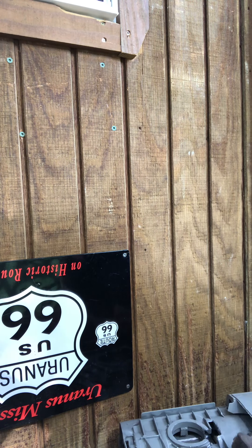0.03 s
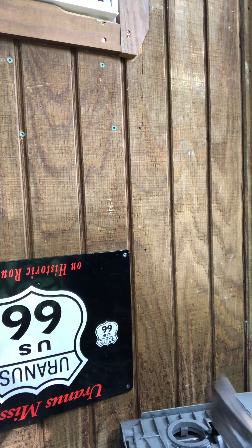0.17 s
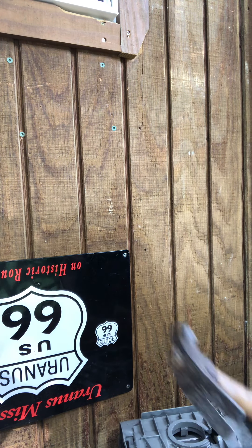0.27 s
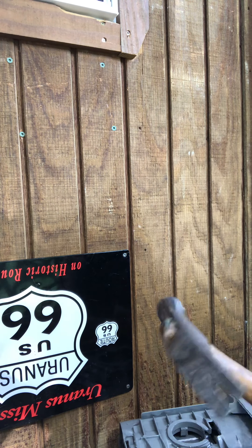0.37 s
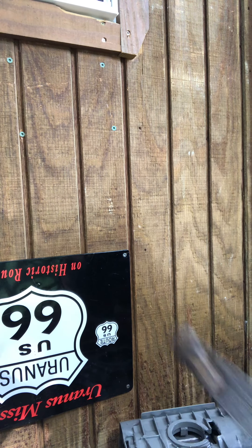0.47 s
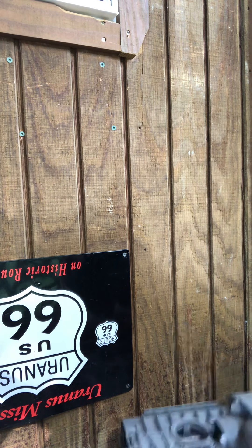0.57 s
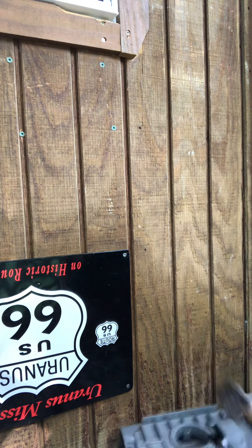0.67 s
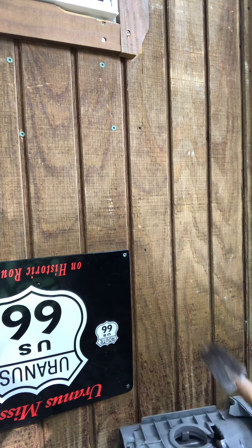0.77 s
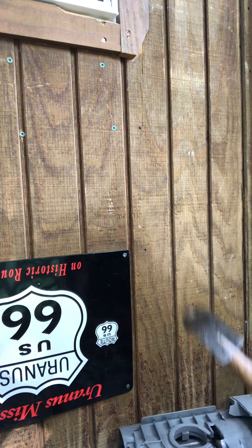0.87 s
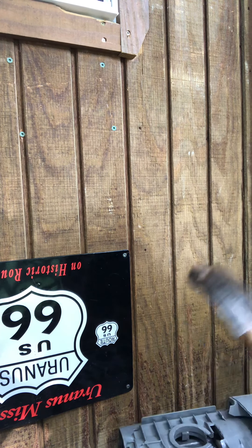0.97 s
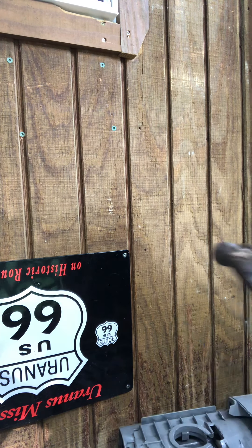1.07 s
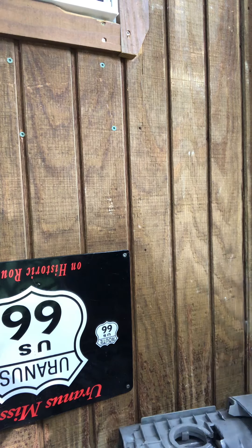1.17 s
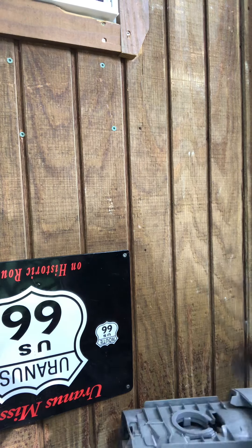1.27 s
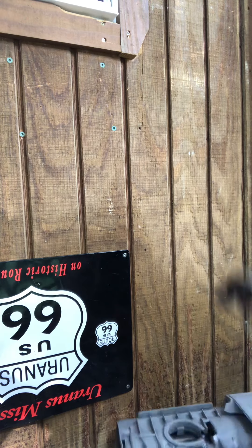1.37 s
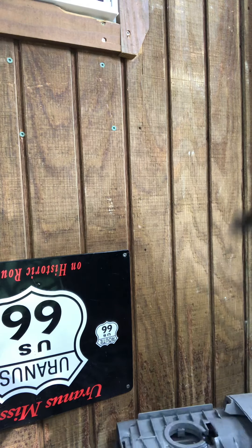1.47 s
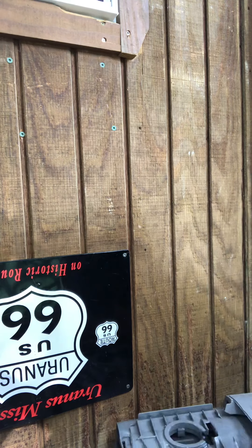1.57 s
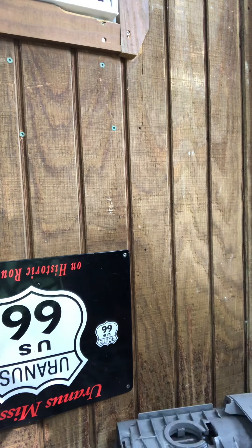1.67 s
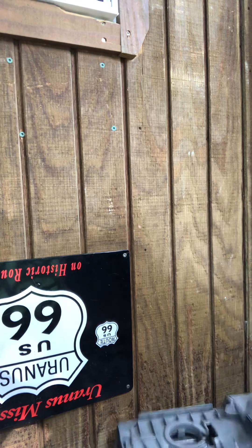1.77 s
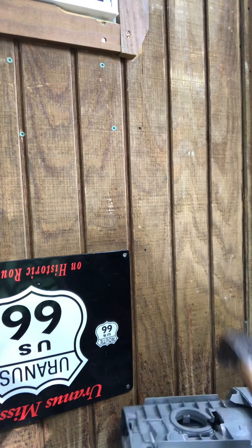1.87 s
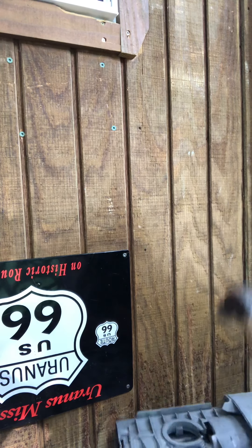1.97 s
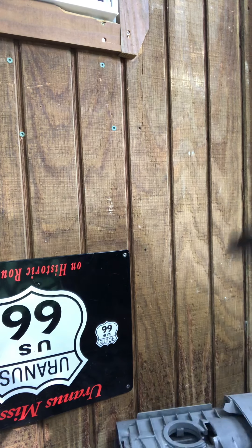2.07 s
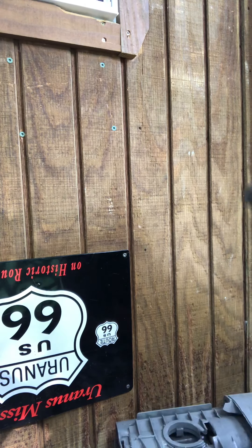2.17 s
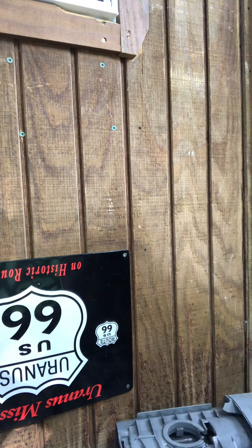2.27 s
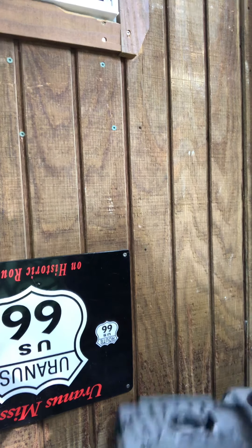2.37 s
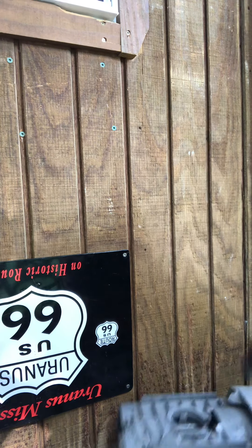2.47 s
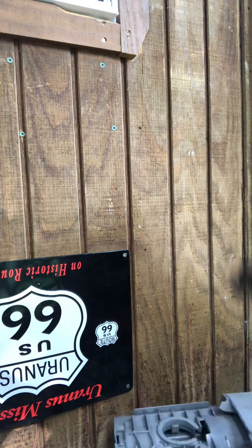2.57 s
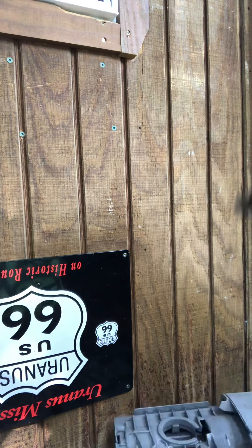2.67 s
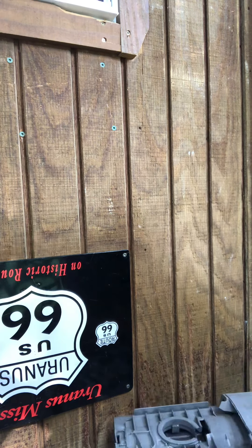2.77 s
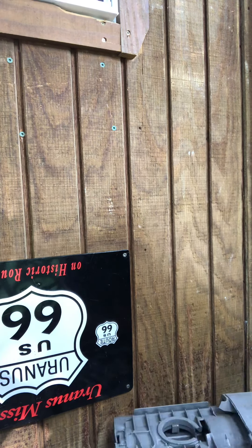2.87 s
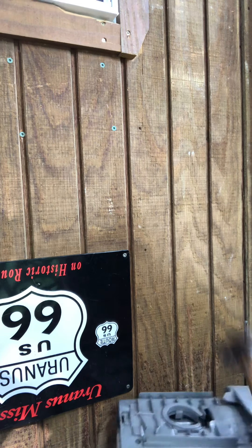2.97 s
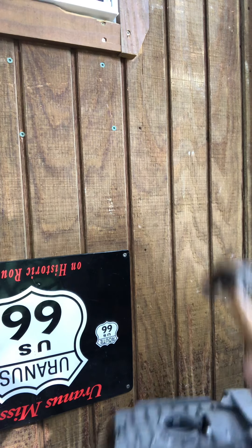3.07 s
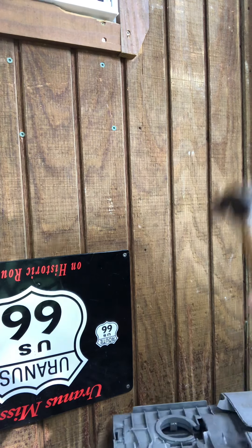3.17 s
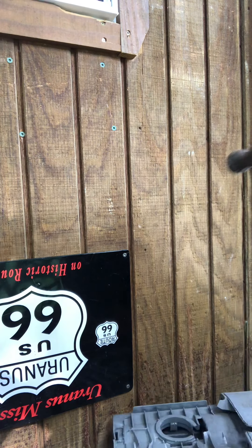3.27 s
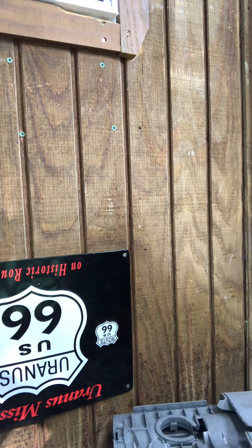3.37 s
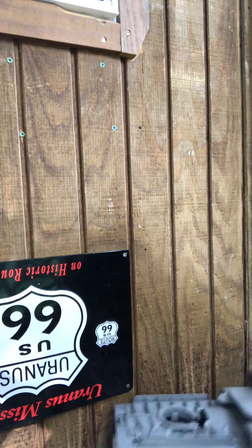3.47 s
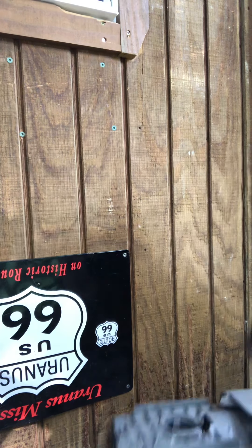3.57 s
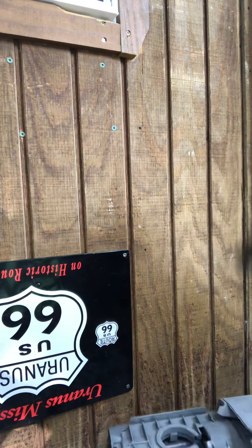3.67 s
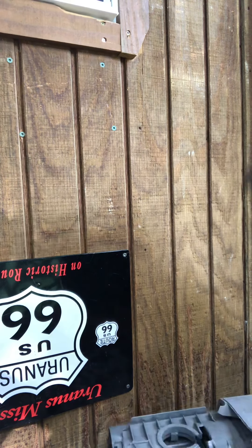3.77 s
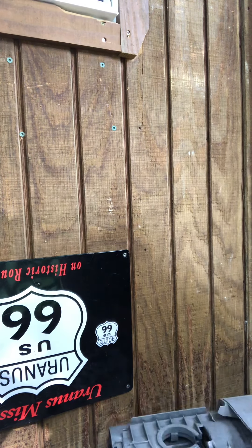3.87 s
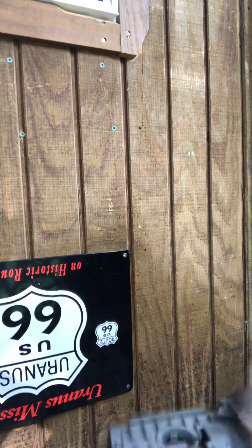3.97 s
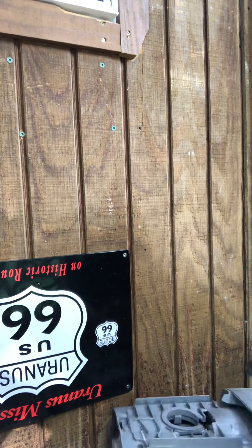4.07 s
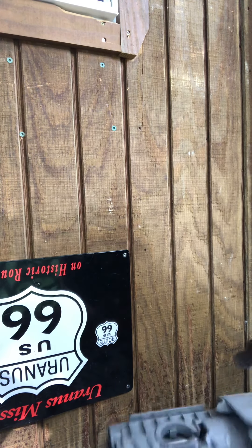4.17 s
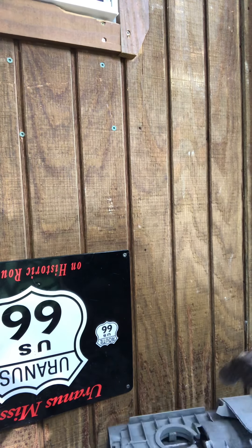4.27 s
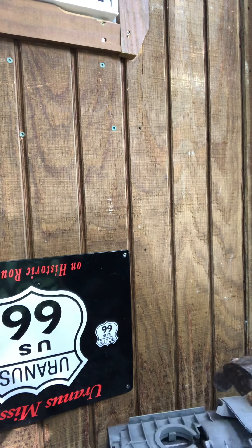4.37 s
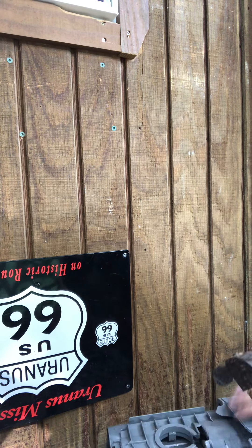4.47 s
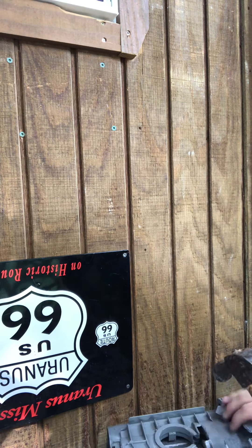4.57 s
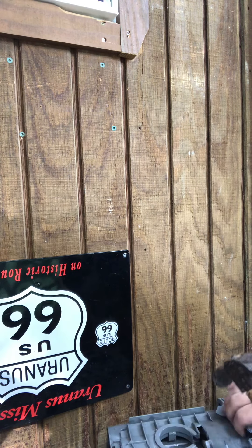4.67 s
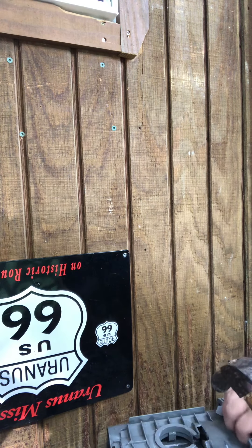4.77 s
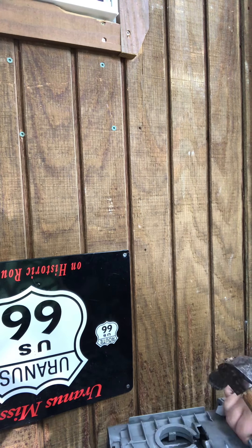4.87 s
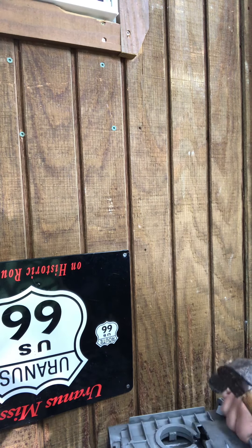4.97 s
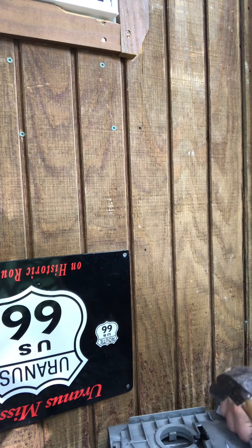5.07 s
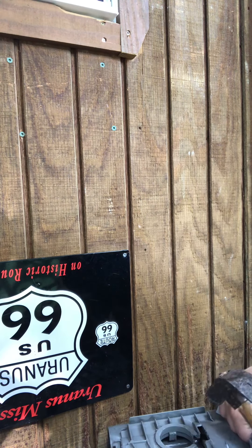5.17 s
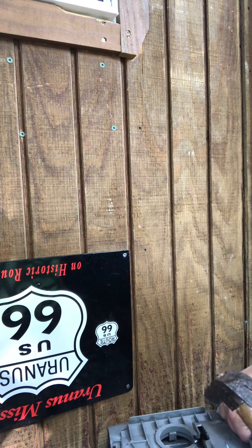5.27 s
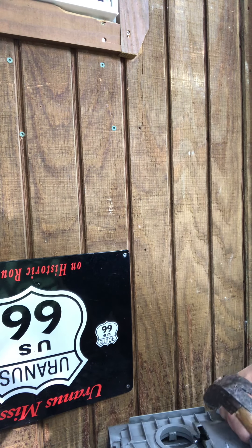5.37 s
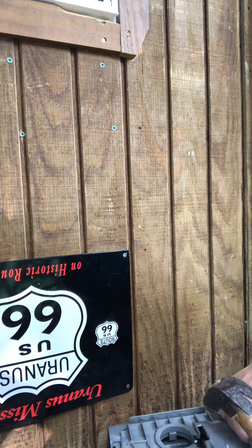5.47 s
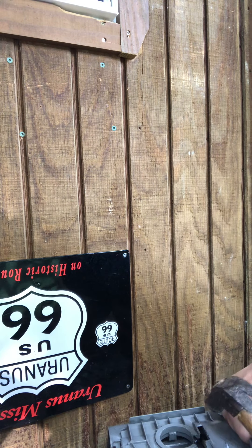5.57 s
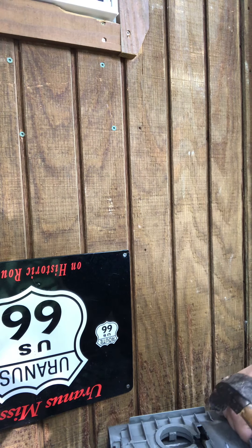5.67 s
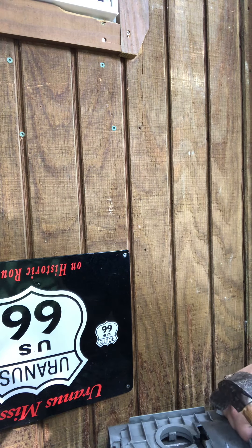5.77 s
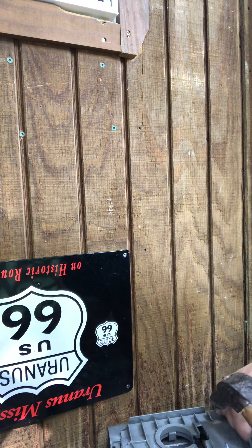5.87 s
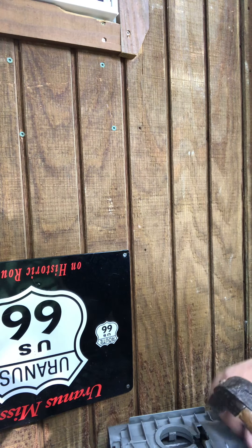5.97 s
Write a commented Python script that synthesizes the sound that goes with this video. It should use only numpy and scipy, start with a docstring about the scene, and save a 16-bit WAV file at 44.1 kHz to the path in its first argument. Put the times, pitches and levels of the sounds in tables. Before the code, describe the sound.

A hammer cracks a hard plastic housing seven times on an outdoor bench, each blow clattering and bouncing, then quiet handling.

```python
"""Outdoors, one microphone at a bench against a plank wall; a far rush like traffic and a low hum lie underneath.
From 0.57 s a hammer strikes a hard plastic housing seven times: noise cracks, shell chatter, a bench boom.
The housing jumps and lands within a fifth of a second of each blow, as clacks and ringing knocks; loose parts tick.
At 4.37 s the steel head clinks once, as a bright set of decaying tones.
Then the hand rubs and bumps the parts, in grainy noise, and a thin whine comes up behind."""
import sys
import numpy as np
from scipy import signal
from scipy.fft import rfft, irfft, next_fast_len
from scipy.io import wavfile
from scipy.ndimage import map_coordinates

SR = 44100
rng = np.random.default_rng(int(sys.argv[2]) if len(sys.argv) > 2 else 0)


def digitize_waveform(pressure):
    """Quantize a signal to 16-bit integers and store it at the path in sys.argv[1].

    Rows of a 2-D input are taken as channels; values are limited to [-1, 1].
    """
    field = np.atleast_2d(pressure).T
    bounded = np.clip(field, -1, 1)
    quanta = np.round(bounded * 32767).astype(np.int16)
    wavfile.write(sys.argv[1], SR, quanta)


N = 265923  # samples
AGE = np.arange(SR // 2) / SR  # s since a contact


def amp(db):
    """Decibels to gain."""
    return np.exp(np.maximum(db, -300) * np.log(10) / 20)


def unit(x):
    """Scale to rms 1."""
    return x / np.sqrt(np.mean(x ** 2) + 1e-20)


def along(points, hz):
    """Interpolate (f/Hz, value) points on a log frequency axis."""
    f, value = np.transpose(points)
    return np.interp(np.log(hz + 1), np.log(f + 1), value)


def curve(rows):
    """One value per sample from (t/s, value) rows."""
    s, value = np.transpose(rows)
    return np.interp(np.arange(N) / SR, s, value)


def wobble(rate, size):
    """A smooth random curve, rate knots a second."""
    knots = rng.standard_normal(int(size * rate / SR) + 4)
    return map_coordinates(knots, [np.arange(size) * rate / SR])


def swell(rise):
    """A soft start that is complete after rise seconds."""
    return np.sin(np.pi / 2 * np.minimum(AGE / rise, 1)) ** 2


def noise(spectrum, size, uneven_db=0):
    """Coloured noise of rms 1; uneven_db adds the chance resonances of one contact point."""
    m = next_fast_len(size)
    hz = np.fft.rfftfreq(m, 1 / SR)
    bumpy = map_coordinates(rng.standard_normal(128), [np.sqrt(hz / hz[-1]) * 127])
    colour = amp(along(spectrum, hz) + uneven_db * bumpy)
    return unit(irfft(rfft(rng.standard_normal(m)) * colour, m)[:size])


def grainy(spectrum, rate, depth_db, uneven_db, size):
    """Noise bunched into many tiny contacts by a random level of up to depth_db either way."""
    steady = noise(spectrum, size, uneven_db)
    return unit(steady * amp(depth_db * np.tanh(wobble(rate, size))))


def ring(modes, scatter_db, detune, drive, cycles, rough):
    """Modes at new strengths build up over a few cycles, low ones last, then die freely with rough phase."""
    out = np.zeros(len(AGE))
    knots = np.linspace(0, AGE[-1], 64)
    for hz, db, t60 in modes:
        strength, pitch, phase = rng.standard_normal(3)
        free = np.maximum(AGE - max(drive, cycles / hz), 0)
        level = swell(cycles / hz) * amp(db + scatter_db * strength - 60 * free / t60)
        # loose joints roughen the phase
        jitter = rough * np.interp(AGE, knots, rng.standard_normal(len(knots)))
        cycle = hz * (1 + detune * pitch) * AGE + phase
        out += level * np.sin(2 * np.pi * cycle + jitter)
    return out


def spread(sound, cycles):
    """Bending waves in a panel travel slower at low pitch: each frequency arrives a few of its cycles late."""
    m = next_fast_len(2 * len(sound))
    lag = 2 * np.pi * cycles * np.log(np.fft.rfftfreq(m, 1 / SR) + 100)
    return irfft(rfft(sound, m) * np.exp(-1j * lag), m)[:len(sound)]


def add(track, s, sound):
    """Mix a sound in at time s."""
    part = track[round(s * SR):][:len(sound)]
    part += sound[:len(part)]


# decay of the answer from plank wall and roof: (f/Hz, t60/s)
WALL_DECAY = [(60, 0.88), (300, 0.47), (1000, 0.32), (4000, 0.33), (8000, 0.2), (15000, 0.048)]


def reflected(sound, wet_db):
    """The sound plus the answer of wall and roof: noise that dies faster in the treble."""
    hz, t, z = signal.stft(rng.standard_normal(len(AGE)), SR, nperseg=256)
    decay = amp(-60 * t / along(WALL_DECAY, hz)[:, None])
    tail = signal.istft(z * decay, SR, nperseg=256)[1]
    out = amp(wet_db) * signal.fftconvolve(sound, tail / np.linalg.norm(tail))
    out[:len(sound)] += sound
    return out


# level of the far rush: (t/s, level/dB)
RUSH_LEVEL = [(0, -41.5), (.56, -40), (.7, -53.5), (4.5, -62.5), (6.03, -66)]
# colour of the far rush: (f/Hz, relative level/dB)
RUSH_COLOUR = [(18, -46), (30, -16), (48, -13), (131, -2), (311, -8), (415, -17), (632, -19), (822, -12),
               (1040, -8.5), (1280, -15.5), (2680, -27.5), (3490, -29), (8520, -47.5), (14800, -55),
               (16000, -59)]


def far_rush():
    """A distant rush like traffic: coloured noise that falls away with a slight flutter."""
    level_db = curve(RUSH_LEVEL) + .7 * wobble(38, N)
    return amp(level_db) * noise(RUSH_COLOUR, N)


# slow swell shared by air, hum and whine: (t/s, level change/dB)
STEADY_SWELL = [(0, 2), (1, 1), (4.7, -2), (6.03, 4)]
# colour of the still air: (f/Hz, relative level/dB)
AIR_COLOUR = [(20, -40.5), (36, -23.5), (55, -8), (85, -11.5), (125, -14), (350, -12.5), (550, -21),
              (1000, -22.5), (1700, -25), (2500, -28), (5000, -30.5), (9000, -44.5), (16000, -53.5)]


def still_air():
    """Still air around the microphone: faint coloured noise under the slow swell."""
    return amp(curve(STEADY_SWELL) - 60) * noise(AIR_COLOUR, N)


# partials of the machine's hum: (f/Hz, level/dB before trim and swell)
HUM_PARTIALS = [(59, -61), (118, -72.5), (199, -73), (366, -77.5)]
HUM_TRIM_DB, WHINE_DB = -3.5, -67  # before the shared swell
WHINE_FAINT_DB, WHINE_START_S, WHINE_RISE_S = -6, 4.7, .4  # the whine stays faint, then comes up


def machine():
    """A machine's hum and thin whine: tones of unsteady phase under the slow swell."""
    t = np.arange(N) / SR
    risen = np.clip((t - WHINE_START_S) / WHINE_RISE_S, 0, 1)
    whine_db = WHINE_DB + WHINE_FAINT_DB * (1 - risen)
    hum = np.zeros(N)
    for hz, db in HUM_PARTIALS:
        hum += amp(db) * np.sqrt(2) * np.sin(2 * np.pi * hz * t + 0.44 * wobble(2.0, N))
    flutter = amp(1.6 * wobble(60, N))
    whine = unit(flutter * np.sin(2 * np.pi * 2169 * t + 1.4 * wobble(130, N)))
    return amp(curve(STEADY_SWELL)) * (amp(HUM_TRIM_DB) * hum + amp(whine_db) * whine)


# strokes of hand and hammer over the plastic: (start t/s, length/s, peak level/dB before the grain)
RUBS = [(4.502, .06, -60.5), (4.697, 0.2, -57.5), (5.6, 0.47, -60.5), (5.937, .1, -49.5)]
# soft bumps of the hand once the hammering is over: (t/s, starting level/dB before the soft onset)
HAND_BUMPS = [(4.514, -43.5), (4.915, -46.5), (4.938, -42), (5.074, -47), (5.182, -47), (5.673, -42.5),
              (5.96, -41)]
# colour of a soft bump: (f/Hz, relative level/dB)
BUMP_COLOUR = [(60, -8), (200, 1), (370, 3), (550, -11.5), (1000, -2.5), (1500, -10.5), (3500, -14.5),
               (7000, -34.5), (14000, -38)]
# colour of small plastic contacts, shared by rubs, ticks and creaks: (f/Hz, relative level/dB)
TICK_COLOUR = [(100, -9.5), (400, 4.5), (1000, 6), (3500, 2), (7500, -8.5), (9000, -19.5), (15000, -17.5)]
REGRIP_S, REGRIP_DB = 0.52, -50.5  # the hand steadies the housing this long after each blow


def handling():
    """A grip slides over the ribs in fine catches and bumps the housing softly."""
    t = np.arange(N) / SR
    pressure = np.zeros(N)
    for s, length, db in RUBS:
        pressure += amp(db) * np.sin(np.pi * np.clip((t - s) / length, 0, 1))
    track = pressure * grainy(TICK_COLOUR, rate=150, depth_db=3.5, uneven_db=1.5, size=N)
    regrips = [(s + REGRIP_S, REGRIP_DB) for s, *_ in BLOWS]
    for s, db in regrips + list(HAND_BUMPS):
        envelope = amp(db - 60 * AGE / 0.12) * swell(0.0065)
        add(track, s, envelope * grainy(BUMP_COLOUR, rate=200, depth_db=4, uneven_db=2.5, size=len(AGE)))
    return track


RATTLE_START_S, RATTLE_GAP_S, RATTLE_JITTER_S = .1, 0.042, .008
RATTLE_DB, RATTLE_FALL_DB_PER_S, RATTLE_SCATTER_DB = -38.5, 62, 2.5


def rattle(count):
    """(t/s, level/dB) of loose parts that chink at uneven gaps after each blow, softer on the whole."""
    rows = []
    for s, *_ in BLOWS:
        for k, (late, strength) in enumerate(rng.standard_normal((count, 2))):
            elapsed = RATTLE_GAP_S * k + RATTLE_JITTER_S * late
            db = RATTLE_DB - RATTLE_FALL_DB_PER_S * elapsed + RATTLE_SCATTER_DB * strength
            rows.append((s + RATTLE_START_S + elapsed, db))
    return rows


# single ticks of loose plastic that stand out: (t/s, starting level/dB before onset and reflection)
SINGLE_TICKS = [(1.349, -35.5), (1.455, -35), (1.753, -39), (1.916, -31), (2.774, -44.5), (2.877, -38.5),
                (3.161, -35.5), (3.256, -47.5), (4.139, -38.5), (5.144, -53.5)]


def ticks():
    """Loose edges touch and stop at once: short grainy noise."""
    track = np.zeros(N)
    size = len(AGE) // 4
    envelope = (amp(-60 * AGE / 0.081) * swell(0.002))[:size]
    for s, db in rattle(count=8) + list(SINGLE_TICKS):
        touch = grainy(TICK_COLOUR, rate=300, depth_db=3, uneven_db=1.5, size=size)
        add(track, s, amp(db) * envelope * touch)
    return reflected(track, wet_db=-8.5)[:N]


# modes of the steel head: (f/Hz, relative level/dB, t60/s)
STEEL_MODES = [(2290, -1, 0.085), (5320, -1.5, 0.11), (6200, -6, 0.12), (7004, -13, 0.15),
               (10300, -6, 0.076), (10920, -5, 0.07), (12380, -11, 0.086), (13360, -2, 0.062),
               (13950, -9, 0.11)]


def clink():
    """Steel touches steel once: a short noise contact and a bright ring."""
    track = np.zeros(N)
    colour = [(100, -6), (1000, 8.0), (3000, 2.5), (14000, -8.0)]  # (f/Hz, relative level/dB)
    touch = amp(-27.5 - 60 * AGE / 0.11) * noise(colour, len(AGE), uneven_db=3.5)
    steel = amp(-36) * ring(STEEL_MODES, scatter_db=3, detune=0, drive=.003, cycles=2, rough=.1)
    add(track, 4.369, reflected(swell(0.0044) * (touch + steel), wet_db=-26.0))
    return track


EDGE_LEAD_S, EDGE_DB = 0.027, -6.5  # one edge touches this early, softer than the rocking
ROCK_S, ROCK_LOSS_DB = .017, 9.5  # time between rocking contacts, loss at each


def contacts(s, db, rocking_db, count):
    """(t/s, level/dB) of one landing: an edge touches, the housing comes down, then it rocks to rest."""
    rows = [(s - EDGE_LEAD_S, db + rocking_db + EDGE_DB), (s, db)]
    for k in range(count):
        rows.append((s + ROCK_S * (k + 1), db + rocking_db - ROCK_LOSS_DB * k))
    return rows


# the housing comes down after its jump:
# (t/s, level/dB before the trims of clack and knock, rocking level/dB relative to the landing)
LANDINGS = [(0.692, -29, -6.5), (1.385, -27.5, -7), (1.98, -32, -5.5), (2.542, -28, -18.5),
            (3.114, -29, -7), (3.647, -30, -8.5), (4.184, -32.5, -3), (4.221, -33, -6.5), (4.331, -35, -10)]
# colour of the rim's clack: (f/Hz, relative level/dB)
CLACK_COLOUR = [(60, -3), (300, 5.5), (700, 2), (1000, 2.5), (1400, -3), (3000, -5.5), (4800, -6.5),
                (7000, -16.5), (9000, -24.5), (15000, -30)]
# modes of the hollow body: (f/Hz, relative level/dB, t60/s)
KNOCK_MODES = [(190.6, -15, 0.26), (281, -7, 0.096), (341.3, -6, 0.16), (375, -2, 0.18), (455.3, -6, 0.077),
               (639, -6.5, 0.083), (833, -9.5, 0.11), (1017, 1, 0.089), (1658, -13.5, 0.041)]


def landings():
    """At every contact the rim clacks and the hollow body's knock builds up over a few cycles."""
    track = np.zeros(N)
    for landing in LANDINGS:
        for s, db in contacts(*landing, count=2):
            envelope = amp(6.5 - 60 * AGE / 0.065) * swell(0.0014)
            clack = envelope * grainy(CLACK_COLOUR, rate=520, depth_db=0.5, uneven_db=4.0, size=len(AGE))
            knock = amp(-1.5) * ring(KNOCK_MODES, scatter_db=1.2, detune=0.028, drive=0.0028,
                                     cycles=5.9, rough=0.36)
            add(track, s, amp(db) * reflected(spread(clack, cycles=3.5) + knock, wet_db=-16))
    return track


# modes of the bench: (f/Hz, relative level/dB, t60/s)
BENCH_MODES = [(62, -2, 0.074), (97.5, -9.5, 0.13)]


def bench_boom(db):
    """The bench booms in two low modes that swell before they die."""
    modes = ring(BENCH_MODES, scatter_db=1.5, detune=0.04, drive=0.051, cycles=2.9, rough=0.21)
    return amp(db) * swell(0.042) * modes


def splinters(rate, spread_db):
    """Sparse, sharp creaks of strained plastic, rms 1: random slips that each decay."""
    size = len(AGE)
    slips = (rng.random(size) < rate / SR) * amp(spread_db * rng.uniform(-1, 1, size))
    bursts = signal.fftconvolve(slips, amp(-60 * AGE / 0.022))[:size]
    return unit(bursts * noise(TICK_COLOUR, size, uneven_db=2.0))


# modes of the plastic shell: (f/Hz, relative level/dB, t60/s)
SHELL_MODES = [(188.3, -12, 0.49), (285.1, -10.5, 0.31), (353.2, -7.5, 0.13), (387.6, 0.5, .1),
               (429.7, -9.5, 0.19), (496, -11.5, 0.14), (710, -12, 0.13), (886, -11, 0.11),
               (1103, -7, 0.13), (1390, -12.5, .1), (1556, -13, .1), (1884, -11.5, .1), (2370, -16.5, 0.11),
               (2780, -14, .09)]


def shell_ring(shell_db, panel_hz, panel_db):
    """The whole shell rings, the struck panel sounds its own pitch, and the plastic creaks springing back."""
    shell = amp(shell_db) * ring(SHELL_MODES, scatter_db=2.6, detune=.008, drive=.038, cycles=1.9, rough=0.54)
    panel = ring([(panel_hz, panel_db, .09)], scatter_db=0, detune=0, drive=0.014, cycles=5.9, rough=1.0)
    creaks = amp(-38 - 60 * AGE / .7) * swell(.06) * splinters(rate=240, spread_db=4)
    return shell + panel + creaks


# colour of the shell's chatter on the bench: (f/Hz, relative level/dB)
CHATTER_COLOUR = [(40, -9.5), (150, -1.5), (350, 4.5), (600, -3.5), (1000, 0.5), (2500, -5), (4500, -8),
                  (7800, -13.5), (8500, -17), (15000, -24)]


def chatter(db, press_s):
    """The shell buzzes against the bench for as long as the hammer presses it down, then fades."""
    pressed = swell(0.023) * amp(-60 * np.maximum(AGE - press_s, 0) / 0.12)
    return amp(db) * pressed * grainy(CHATTER_COLOUR, rate=400, depth_db=2.0, uneven_db=3.0, size=len(AGE))


# colour of the first snap: (f/Hz, relative level/dB)
SNAP_COLOUR = [(200, -26.5), (1000, -4.5), (3000, 1.5), (7800, -1.5), (8500, -7), (15000, -11.5)]
# colour of the crack: (f/Hz, relative level/dB)
CRACK_COLOUR = [(40, -30.5), (130, -18), (260, -6.5), (480, -7), (600, -8), (850, -2.5), (1200, -3.5),
                (2000, -4.5), (4500, -9), (7900, -17.5), (8400, -20), (14000, -22), (16000, -30.5)]


def head_crack(db, length):
    """The head meets the plastic: a bright decaying snap over a grainy crack held for length seconds."""
    snap = amp(db + 2.5 - 60 * AGE / 0.03) * noise(SNAP_COLOUR, len(AGE), uneven_db=2.5)
    held = amp(db - 60 * np.maximum(AGE - length, 0) / 0.016)
    crack = held * grainy(CRACK_COLOUR, rate=750, depth_db=6, uneven_db=2.5, size=len(AGE))
    return (snap + crack) * swell(0.00026)


# hammer blows: (t/s, crack level/dB, crack length/s, chatter level/dB, press time/s,
# bench level/dB, shell ring level/dB, struck panel f/Hz, panel level/dB); levels before onsets and ring modes
BLOWS = [(0.567, -12.5, 0.011, -19.5, 0.053, -30, -25.5, 1200, -20),
         (1.207, -14.5, 0.015, -17.5, .042, -19, -23.5, 2810, -23.5),
         (1.792, -11, 0.0097, -15.5, 0.039, -16, -29.5, 726, -27.5),
         (2.351, -14, 0.0097, -15.5, 0.034, -20.5, -21, 481, -17.5),
         (2.9245, -12, 0.006, -15, 0.033, -16, -21, 289, -19),
         (3.4483, -11, 0.0049, -15, 0.031, -18, -22, 861, -21),
         (3.991, -11, 0.007, -16.5, 0.033, -17, -21.5, 1110, -20.5)]


def blows():
    """The head cracks onto the shell, drives it chattering into the bench, and the bench booms."""
    track = np.zeros(N)
    for s, crack_db, length, chatter_db, press_s, bench_db, shell_db, panel_hz, panel_db in BLOWS:
        impact = spread(head_crack(crack_db, length) + chatter(chatter_db, press_s), cycles=2.2)
        ringing = shell_ring(shell_db, panel_hz, panel_db)
        bench = bench_boom(bench_db)
        add(track, s, reflected(impact + ringing, wet_db=-19.0))
        add(track, s, bench)
    return track


def scene():
    """Everything at one microphone, hammer and bench over the far background."""
    work = blows() + landings() + ticks() + clink() + handling()
    background = machine() + far_rush() + still_air()
    return (work + background)[None]


def record(dry):
    """The recorder rounds off the highest peaks and cuts steeply above its band limit."""
    rounded = dry / (1 + np.abs(dry / .85) ** 4) ** (1 / 4)
    m = next_fast_len(N + SR // 2)
    band_limit = 1 + (np.fft.rfftfreq(m, 1 / SR) / 16100) ** 80  # corner in Hz
    return irfft(rfft(rounded, m) / band_limit, m)[..., :N]


dry = scene()
out = record(dry)
digitize_waveform(out)
```